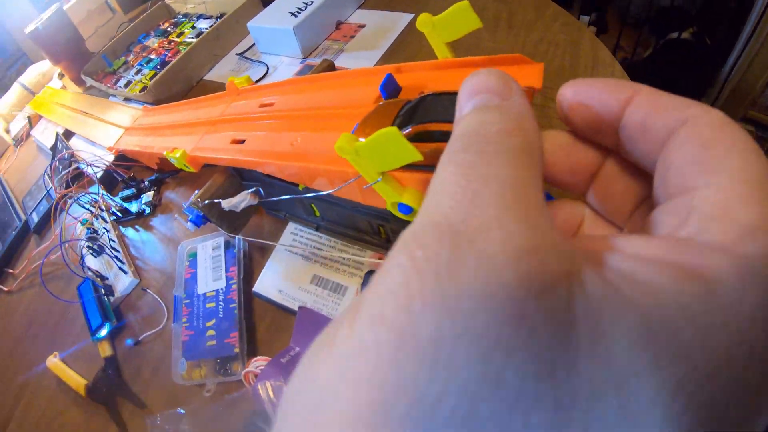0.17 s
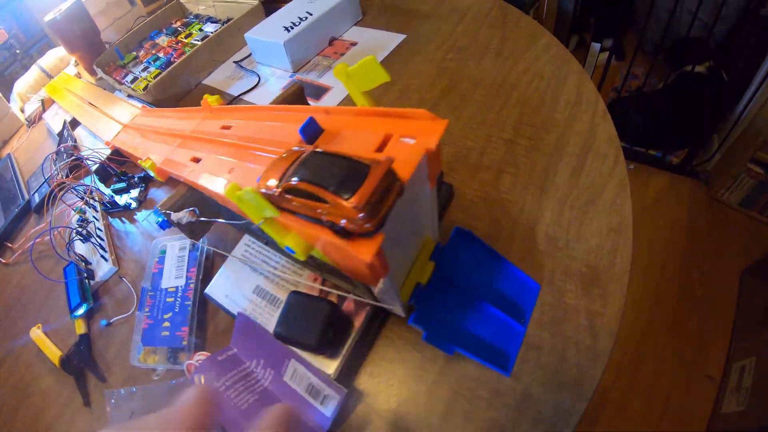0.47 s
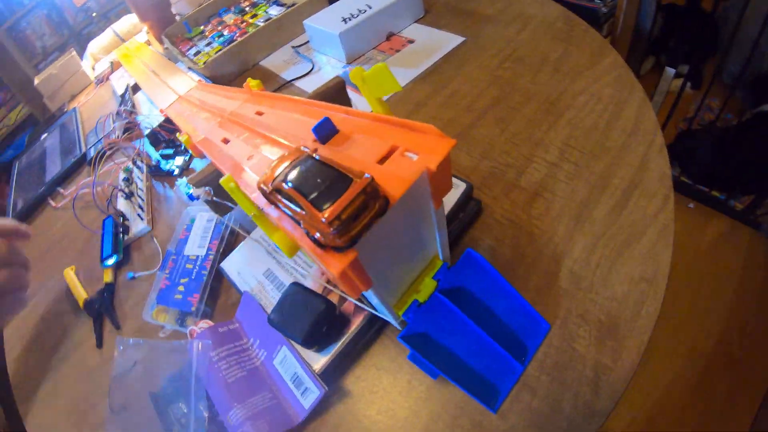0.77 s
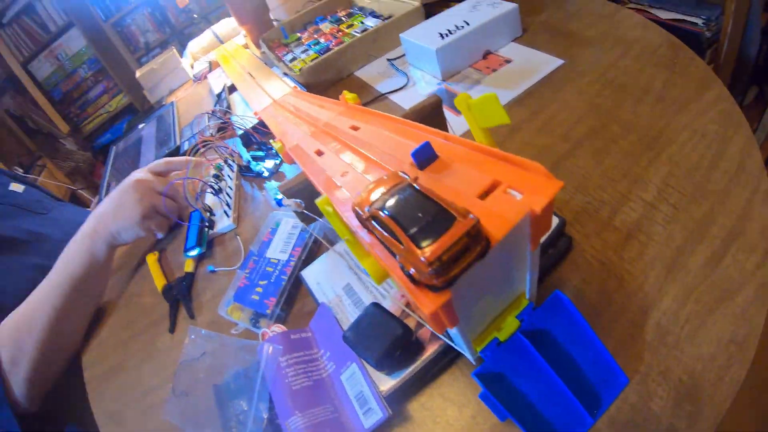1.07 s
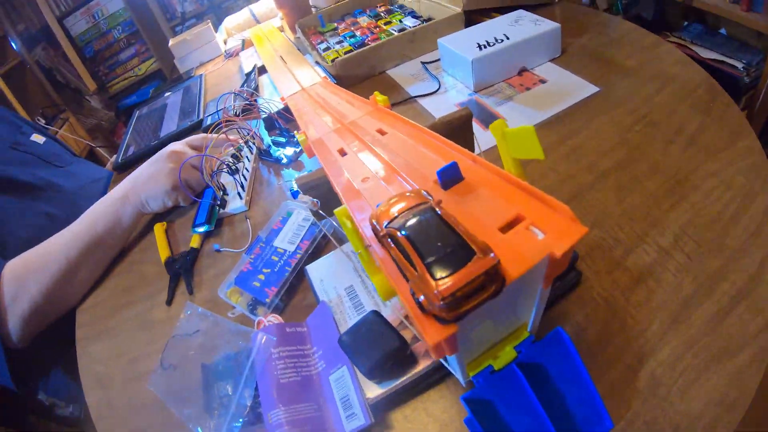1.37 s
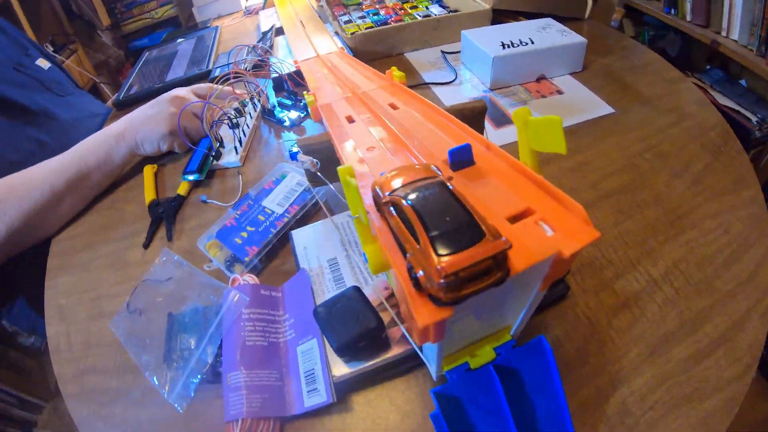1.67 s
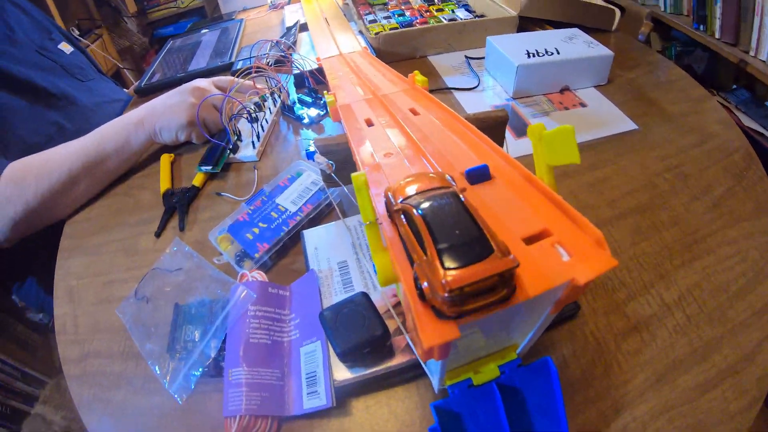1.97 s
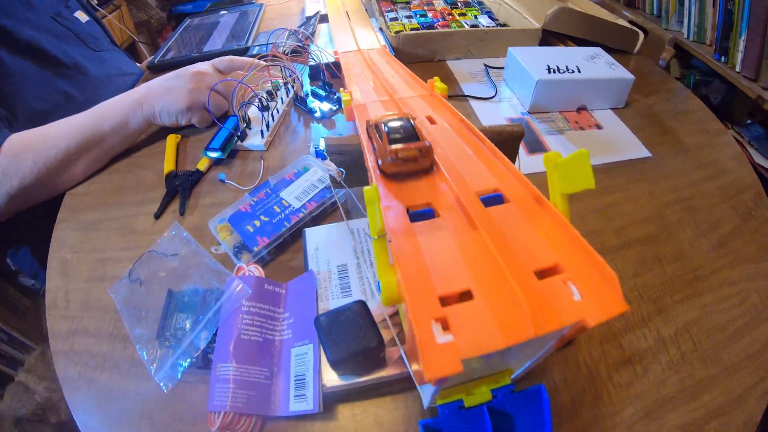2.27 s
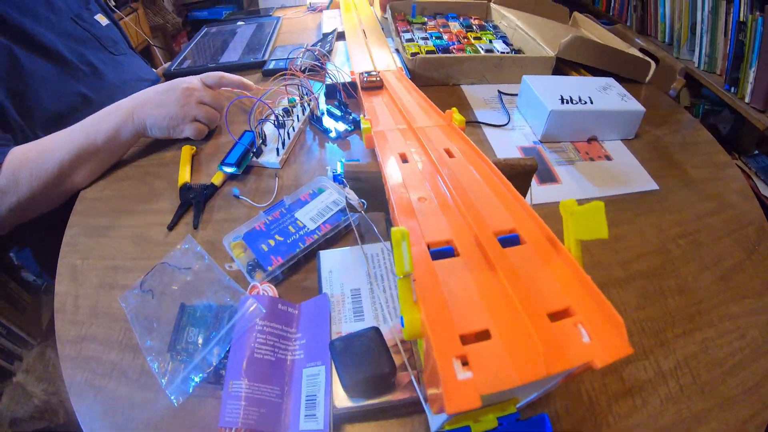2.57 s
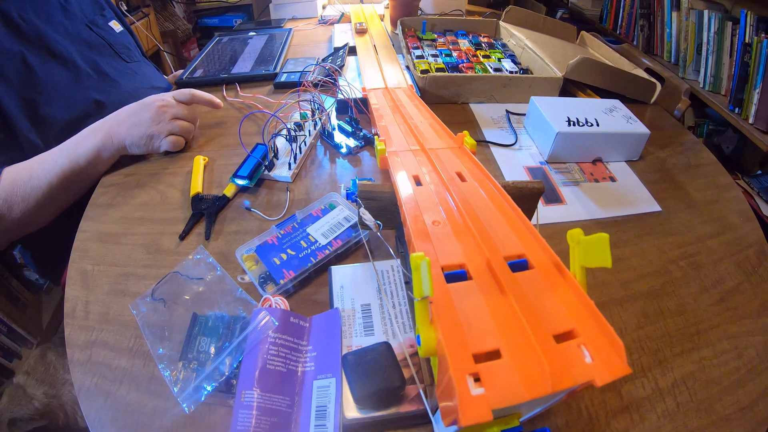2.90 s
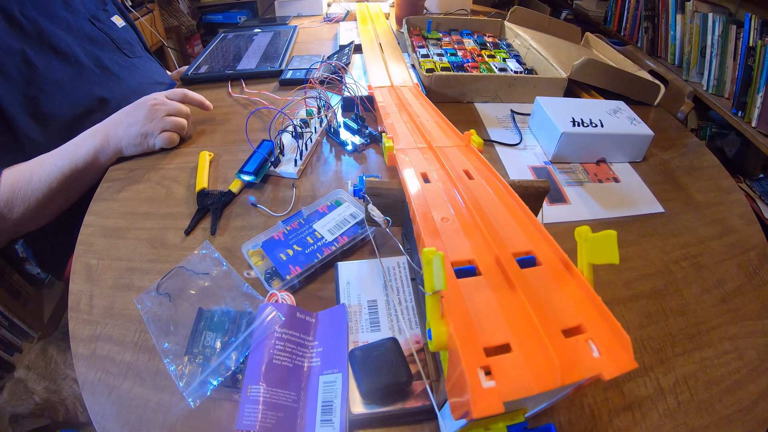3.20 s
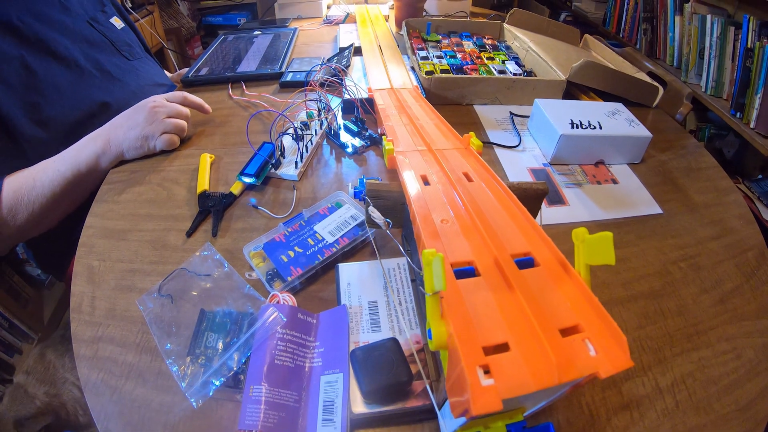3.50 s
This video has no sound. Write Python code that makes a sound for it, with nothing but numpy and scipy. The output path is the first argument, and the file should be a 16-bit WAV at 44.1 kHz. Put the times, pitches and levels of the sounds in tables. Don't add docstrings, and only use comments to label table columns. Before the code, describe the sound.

A die-cast toy car clicks into a plastic gate, snapping sharply at 0.13 seconds. Faint rapid servo ticking continues over quiet room tone, with a sleeve rustle and soft table thumps around 1.0-1.5. At 2.0 the latch clicks and a brief gear whine rises and falls. The car rattles over track joints, loudest near 2.5-2.8, fades, lands at 3.3, bangs the stop around 3.37-3.41, then skitters until 3.65.

```python
import sys
import numpy as np
from scipy import signal
from scipy.io import wavfile
from scipy.ndimage import uniform_filter1d

SR = 44100
rng = np.random.default_rng(int(sys.argv[2]) if len(sys.argv) > 2 else 0)


def gain_from_db(level_db):
    decades = np.asarray(level_db, float) / 20
    return 10 ** decades


def generate_wav(sig):
    pcm = np.round(np.clip(np.atleast_2d(sig).T, -1, 1) * 32767).astype(np.int16)
    wavfile.write(sys.argv[1], SR, pcm)


N = 160965
T = np.arange(N) / SR

# time in seconds, pitch of the meshing gears in Hz, level in dB.
SERVO_SWEEP = [
    (2.014, 860, -51),
    (2.04, 1404, -35.5),
    (2.058, 2100, -34.5),
    (2.098, 2750, -35),
    (2.138, 2680, -35.5),
    (2.181, 2404, -35.5),
    (2.217, 1996, -35),
    (2.31, 1690, -53.5),
]
# pitch in Hz, width in Hz, level in dB.
GATE_RINGS = [(910, 220, -15.5), (1380, 93, 5.5), (2110, 460, -4), (3330, 233, 4.5), (4080, 420, -2),
              (5230, 147, -3), (8900, 610, -27)]
# pitch in Hz, width in Hz, level in dB.
CHASSIS_RINGS = [(1345, 345, 6), (2970, 650, 11.5), (5070, 440, 4.5), (5780, 470, -0.5), (8540, 180, -4),
                 (9730, 460, -4.5)]


def evened(x):
    return x / np.sqrt(np.mean(x ** 2) + 1e-20)


def read(points, hz):
    f, value = np.transpose(points)
    return np.interp(np.log(hz + 1), np.log(f + 1), value)


def colour(x, points):
    hz = np.abs(np.fft.fftfreq(4096, 1 / SR))
    log_gain = np.log(gain_from_db(np.maximum(read(points, hz), -100)))
    response = np.exp(log_gain - 1j * signal.hilbert(log_gain).imag)
    return signal.oaconvolve(x, np.fft.ifft(response).real[:2048])[:len(x)]


def resonate(x, hz, width):
    turn = np.exp(2j * np.pi * np.cumsum(hz * np.ones(len(x))) / SR)
    r = np.exp(-np.pi * width / SR)
    return 2 * (turn * signal.lfilter([1 - r], [1, -r], x / turn + 1e-18)).real


def body(x, peaks, tilt=0, widen=1):
    total = 0
    for k, (hz, width, db) in enumerate(peaks):
        gain = (-1) ** k * gain_from_db(db + tilt * np.log2(hz / 1000))
        total = total + gain * resonate(x, hz, width * widen)
    return total


def grains(per_s, spread_db):
    size, chance, side = rng.random((3, N))
    strength = gain_from_db(spread_db * np.minimum(-np.log(size + 1e-9), 5))
    return strength * (chance < per_s / SR) * np.sign(side - .5)


def drift(pole):
    return evened(signal.lfilter([1], [1, -2 * pole, pole ** 2], rng.standard_normal(N)))


def curve_gain(s, db):
    return gain_from_db(np.interp(T, s, db, left=-150, right=-150))


def swell(start, length, power=1):
    return np.sin(np.pi * np.clip((T - start) / length, 0, 1) ** power)


def hits(rows, peaks, widen, rise):
    out, t = np.zeros(N + SR), np.arange(SR // 4) / SR
    bursts = rng.standard_normal((len(rows), len(t)))
    for (s, db, length, tilt), noise in zip(rows, bursts):
        u = t / max(length, 2e-4)
        contact = noise * np.minimum(u / rise, 1) * np.exp(-u)
        ring = body(contact, peaks, tilt, widen)
        out[round(s * SR):][:len(t)] += gain_from_db(db) * ring / np.abs(ring).max()
    return out[:N]


def air():
    # pitch in Hz, level in dB per Hz.
    tone_colour = [(25, -12), (100, -16), (170, -7), (394, -7), (850, -18), (2850, -14), (7500, -27),
                   (15000, -54)]
    # time in seconds, hiss level in dB.
    hiss_level = [(0, -70.5), (.27, -73.5), (.33, -62.5), (.6, -63.5), (.65, -68), (1.3, -73), (3.65, -86)]
    # pitch of the hump in Hz, width in Hz, level in dB.
    hiss_humps = [(3800, 6200, -2.6), (10760, 850, 0.5)]
    same = 0.022
    frames, hz = N // 256 + 5, np.fft.rfftfreq(1024, 1 / SR)
    a, b, c, d, patches = rng.standard_normal((frames, 513, 5)).T
    patches = uniform_filter1d(patches, size=12, axis=0)
    patches = evened(uniform_filter1d(patches, size=14, axis=1))
    left = a + 1j * b
    right = same * left + np.sqrt(1 - same ** 2) * (c + 1j * d)
    spectrum = np.array([left, right]) * gain_from_db(read(tone_colour, hz)[:, None] + 1.5 * patches)
    tone = evened(signal.istft(spectrum, nperseg=1024, noverlap=768)[1][:, :N])
    hiss = [evened(body(body(n, hiss_humps), hiss_humps)) for n in rng.standard_normal((2, N))]
    return gain_from_db(-66.5) * tone + curve_gain(*np.transpose(hiss_level)) * hiss


def rustles():
    # start in seconds, length in seconds, level in dB.
    brushes = [
        (0.01, 0.14, -65.5),
        (0.668, 0.048, -73),
        (1.11, 0.22, -62.5),
    ]
    # pitch in Hz, level in dB per Hz.
    cloth = [(100, -7), (2500, -10.5), (6000, -19.5), (12000, -45)]
    crackle = evened(colour(grains(4000, 1.2), cloth))
    return crackle * sum(gain_from_db(db) * swell(s, length, 0.67) for s, length, db in brushes)


def servo_hold():
    # pitch of the housing in Hz, width in Hz, level in dB.
    housing = [(780, 110, -6), (1370, 80, -3), (2230, 90, -.5), (2850, 130, 1.5), (3330, 120, -1.5),
               (4150, 180, -2.5)]
    ticks_per_s, first_s, twitch_s = 49.96, .0171, .00007
    age = (T - first_s) % (1 / ticks_per_s)
    index = np.floor((T - first_s) * ticks_per_s).astype(int) + 1
    rough = 1 + .2 * rng.standard_normal(N)
    strength = gain_from_db(.4 * rng.standard_normal(400)[index])
    drive = rough * (age / twitch_s) * np.exp(-age / twitch_s) * strength
    ticking = evened(body(body(drive, housing), housing, widen=2.5))
    return gain_from_db(-68.5) * ticking * (T < SERVO_SWEEP[0][0])


def gate_clicks():
    # time in seconds, peak in dB, length in seconds, tilt in dB per octave.
    clicks = [
        (.029, -31.5, 0.002, -2.5),
        (.079, -39.5, 0.032, -7),
        (.0922, -27, 0.0038, 14.5),
        (.108, -35.5, 0.013, -7.5),
        (.1346, -18.5, 0.0056, -0.5),
        (.1405, -23, 0.0017, 0),
    ]
    return hits(clicks, GATE_RINGS, 1.37, 0.064)


def sections():
    # start in seconds, length in seconds, pitch in Hz, width in Hz, level in dB.
    hums = [
        (2.77, .14, 75, 50, -65),
        (3.0, .15, 580, 170, -49),
        (3.2, .1, 3330, 330, -44),
        (2.52, .1, 390, 90, -48),
        (2.82, .22, 5050, 200, -53),
        (2.13, .2, 170, 80, -58),
        (.03, .33, 165, 60, -69),
    ]
    grit = grains(3400, 0.84)
    total = 0
    for s, length, hz, width, db in hums:
        hum = evened(resonate(resonate(grit, hz, width), hz, width))
        total = total + gain_from_db(db) * swell(s, length) * hum
    return total


def table_bumps():
    # time in seconds, peak in dB, length in seconds, tilt in dB per octave.
    bumps = [
        (1.022, -37.5, 0.026, -11),
        (1.14, -52.5, 0.053, 4),
        (1.493, -44.5, 0.0027, -0.5),
        (1.615, -56.5, 0.0064, -23),
        (2.011, -41, 0.0035, 10),
        (2.142, -48, 0.0011, 9),
        (.137, -46.5, 0.0081, 23),
        (3.39, -29.5, 0.077, -0.5),
    ]
    # pitch of the table in Hz, width in Hz, level in dB.
    table_top = [(104.5, 13, 1), (154, 17.6, -2.5), (231, 37, -7), (400, 41, -22.5), (650, 70, -39.5)]
    return hits(bumps, table_top, 1.0, 0.36) * gain_from_db([[-5.5], [3.5]])


def finger_ticks():
    # time in seconds, peak in dB, length in seconds, tilt in dB per octave.
    touches = [
        (.2942, -36, 0.0032, 0),
        (.669, -46.5, 0.003, 2),
        (.672, -45.5, 0.018, 7),
    ]
    return hits(touches, GATE_RINGS, 4.8, 0.057)


def joints():
    # time in seconds, peak in dB, length in seconds, tilt in dB per octave.
    knocks = [
        (2.0102, -21.5, 0.00098, 4),
        (2.0217, -30, 0.0011, 7),
        (2.271, -24, 0.008, 3),
        (2.362, -14.5, 0.0036, -3),
        (2.433, -22.5, 0.0027, 1),
        (2.5058, -6, 0.0014, 2),
        (2.558, -16, 0.0009, 4),
        (2.744, -12.5, 0.0027, -1.5),
        (2.782, -15.5, 0.00047, 8),
    ]
    return hits(knocks, CHASSIS_RINGS, 0.8, 0.96)


def servo_sweep():
    # multiple of the gear pitch, width in Hz, level in dB.
    partials = [(.5, 120, -9), (1, 130, -3), (1.5, 200, -9), (2, 200, 1.5), (3, 350, -2), (4, 900, -2)]
    # pitch of the gearbox shell in Hz, width in Hz, level in dB.
    gearbox = [(1381, 71, -5), (2160, 39, 4), (2680, 725, -3.5), (4280, 235, 1.5), (4840, 135, 0.5),
               (5560, 176, -1.5), (6600, 430, -3.5), (8840, 470, -1), (10340, 350, 0), (14000, 460, -12.5)]
    s, hz, db = np.transpose(SERVO_SWEEP)
    mesh = np.interp(T, s, hz)
    noise = rng.standard_normal(N)
    whine = 0
    for k, width, level in partials:
        partial = resonate(resonate(noise, k * mesh, width), k * mesh, width)
        whine = whine + gain_from_db(level) * evened(partial)
    shell = body(whine, gearbox, 0, 4.2)
    moving = (T > s[1]) & (T < s[-2])
    grit = evened(body(grains(9000, 2.8), gearbox, 0.23, 2.1))
    return curve_gain(s, db) * (shell / shell[moving].std() + gain_from_db(-2) * grit)


def car():
    # time in seconds, level in dB, nearness (extra treble) in dB.
    rolling = [(2.202, -38.5, 2), (2.3, -27.5, 7), (2.36, -25, -10), (2.5, -24.5, 2.5), (2.6, -23.5, 8.5),
               (2.7, -21.5, 6.5), (2.782, -20, 7.5), (2.799, -29, 11), (2.9, -29.5, 7.5),
               (3.05, -31.5, 8.5), (3.27, -34, 8), (3.357, -58, 30.5)]
    # pitch in Hz, level in dB per Hz.
    track_colour = [(90, -14.5), (350, -11), (800, -7), (2700, 3.5), (3900, -2), (5200, -20.5),
                    (10500, -27.5), (15000, -55)]
    # pitch of the track in Hz, width in Hz, level in dB.
    track_rings = [(409.5, 23, 6), (5150, 110, -4.5), (3700, 220, -7)]
    wander_db, chatter_db = 4.5, 1.5
    s, db, near_db = np.transpose(rolling)
    t, rattle = np.arange(1500) / SR, 0
    for hz in np.geomspace(350, 4100, 25):
        decay = np.exp(-hz * t * np.pi / 8)
        tap = np.sin(2 * np.pi * hz * t) * (hz * t) * decay * hz
        taps = grains(220, 3.3) * gain_from_db(wander_db * drift(.999))
        rattle = rattle + gain_from_db(read(track_colour, hz)) * signal.oaconvolve(taps, tap)[:N]
    grit = grains(4000, 2.5)
    rings = evened(body(grit * gain_from_db(wander_db * drift(0.82)), track_rings))
    roll = evened(colour(grit, track_colour)) + gain_from_db(-19) * rings + gain_from_db(-4.5) * evened(rattle)
    high = signal.sosfilt(signal.butter(2, 5000, "high", fs=SR, output="sos"), roll)
    roll = roll + (gain_from_db(np.interp(T, s, near_db)) - 1) * high
    return curve_gain(s, db + chatter_db * .5) * evened(roll * gain_from_db(chatter_db * drift(0.99)))


def rattles():
    # time in seconds, peak in dB, pitch in Hz.
    strikes = [(2.35, -22, 2700), (2.3744, -27, 3410), (2.3812, -20.5, 3170), (2.3924, -22.5, 3160),
               (2.413, -16, 2290), (2.4334, -17.5, 1480), (2.4504, -19, 2380), (2.4623, -20.5, 2970),
               (2.4778, -16, 2900), (2.5256, -34, 2790), (2.5453, -20, 2860), (2.564, -15, 2770),
               (2.5814, -15.5, 2660), (2.6099, -17.5, 3400), (2.6147, -15.5, 3420), (2.6324, -17.5, 2670),
               (2.6526, -14, 2700), (2.6645, -17, 2660), (2.6794, -13, 1720), (2.6844, -17, 3270),
               (2.6915, -17.5, 2140), (2.6953, -13.5, 2570), (2.7044, -21, 3600), (2.7153, -20, 3240),
               (2.7198, -15, 2830), (2.727, -18.5, 2480), (2.7328, -13.5, 1470), (2.756, -18, 3300),
               (2.7678, -16, 3350), (2.7928, -24, 2300), (2.8194, -19.5, 2370), (2.8294, -23, 5350),
               (2.8359, -20, 3240), (2.8593, -22, 3580), (2.8766, -24.5, 3620), (2.8858, -33, 3040),
               (2.9039, -27.5, 3700), (2.9164, -32, 2140), (2.9322, -33, 1940), (2.946, -30, 2570),
               (2.9694, -31, 2100), (3.0198, -24.5, 2670), (3.052, -40, 2100), (3.2192, -29.5, 3400)]
    strike_s = .0024
    out, t = np.zeros(N + SR), np.arange(1024) / SR
    for (s, db, hz), noise in zip(strikes, rng.standard_normal((len(strikes), len(t)))):
        burst = noise * (t / strike_s) * np.exp(-t / strike_s * 2)
        snap = evened(body(burst, CHASSIS_RINGS, -4, 2.5))
        tap = evened(resonate(burst, hz, 750)) + gain_from_db(-11) * snap
        out[round(s * SR):][:len(t)] += gain_from_db(db - 2.5) * tap / np.abs(tap).max()
    return out[:N]


def landings():
    # time in seconds, peak in dB, length in seconds, tilt in dB per octave.
    drops = [
        (3.3005, -27, 0.01, 0),
        (3.339, -27.5, 0.012, -1.5),
    ]
    # pitch of the run-out in Hz, width in Hz, level in dB.
    runout = [(457, 85, 5.5), (630, 120, 4.5), (1850, 630, -6), (3540, 680, -4.5), (4940, 410, -3.5),
              (8900, 1600, -14)]
    return hits(drops, runout, 1.5, 0.14)


def end_stop():
    # time in seconds, peak in dB, length in seconds, tilt in dB per octave.
    blows = [
        (3.366, -10, 0.0017, -3.5),
        (3.376, -19, 0.017, -3.5),
        (3.3885, -8, 0.0044, 3.5),
        (3.401, -13.5, 0.0044, -3.5),
        (3.41, -15.5, 0.033, -0.5),
        (3.465, -26.5, 0.01, -7.5),
    ]
    # pitch of the stop in Hz, width in Hz, level in dB.
    stop_rings = [(122.8, 10.2, 0.5), (387, 16.8, 6.5), (843, 120, 0.5), (943, 53, 6), (1006, 40, 5),
                  (1324, 140, 0.5), (1533, 100, 5), (1820, 130, -2.5), (2140, 200, 0), (3240, 670, -7.5),
                  (4910, 620, -12)]
    return hits(blows, stop_rings, 1.22, 0.0063)


def skitter():
    # time in seconds, peak in dB, length in seconds, tilt in dB per octave.
    skips = [
        (3.3706, -27, 0.032, 9.5),
        (3.456, -20.5, 0.025, -1.5),
        (3.4627, -23.5, 0.0065, 14.5),
        (3.5206, -25.5, 0.079, -6.5),
        (3.5385, -21, 0.026, -3.5),
        (3.5913, -24.5, 0.056, -2),
        (3.636, -24.5, 0.013, -4.5),
    ]
    # pitch of the loose parts in Hz, width in Hz, level in dB.
    loose_parts = [(1460, 950, -10), (3420, 225, 5), (5200, 210, 4), (9040, 1180, 4), (10450, 1040, 2)]
    return hits(skips, loose_parts, 4.56, 0.037)


def room(x):
    # pitch in Hz, time to fade by 60 dB in seconds.
    fade_times = [(150, 0.54), (1200, 0.2), (4000, 0.084), (12000, 0.12)]
    taps = np.zeros((2, SR // 2))
    at = np.arange(60, SR // 2 - 20, 20) + rng.integers(0, 20, (2, (SR // 2 - 61) // 20))
    np.put_along_axis(taps, at, rng.choice([-1., 1.], at.shape), 1)
    hz, t, z = signal.stft(taps, SR, nperseg=256)
    fade = gain_from_db(-60 * t / read(fade_times, hz)[:, None])
    tail = signal.istft(z * fade, SR, nperseg=256)[1]
    return signal.fftconvolve(x[None], tail / np.linalg.norm(tail[0]), axes=1)[:, :N]


def scene():
    # pitch in Hz, level in dB.
    wet_colour = [(250, -17), (600, -1), (2500, -1.5), (7000, 4), (12000, 4.5)]
    near = servo_sweep() + gate_clicks() + finger_ticks() + rustles()
    far = car() + rattles() + landings() + joints() + end_stop() + skitter()
    bumps = table_bumps()
    no_rumble = signal.butter(4, 120, "high", fs=SR, output="sos")
    direct = signal.sosfilt(no_rumble, near + far)
    holding = servo_hold() * gain_from_db([[-2.5], [2.5]])
    reflected = room(colour(gain_from_db(-5.0) * near + gain_from_db(-4.5) * far, wet_colour))
    return direct + holding + reflected + bumps + sections() + air()


def band_limit(x):
    return signal.sosfilt(signal.butter(12, 16430, fs=SR, output="sos"), x)


def record(dry):
    edge = signal.firwin(127, 14270, fs=SR)[None]
    return band_limit(signal.oaconvolve(dry, edge, "same"))


dry = scene()
out = record(dry)
generate_wav(out)
```